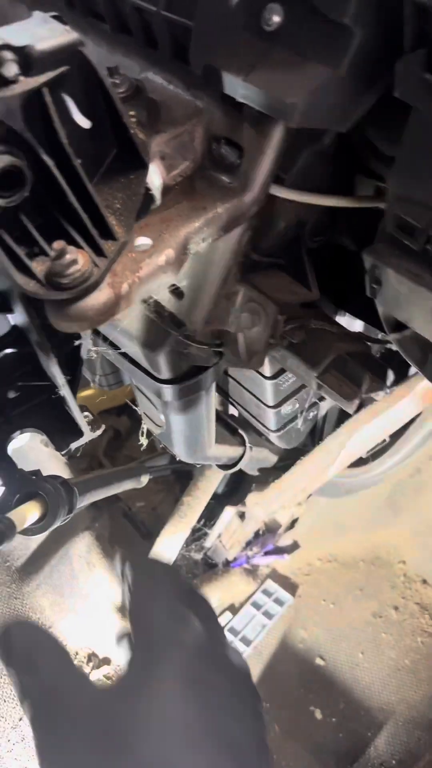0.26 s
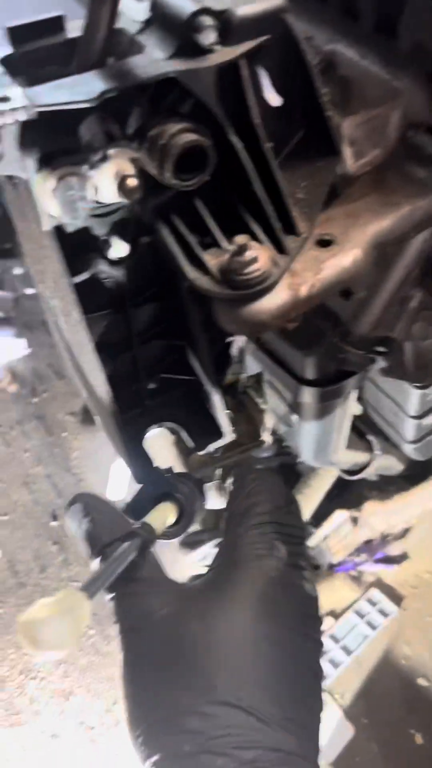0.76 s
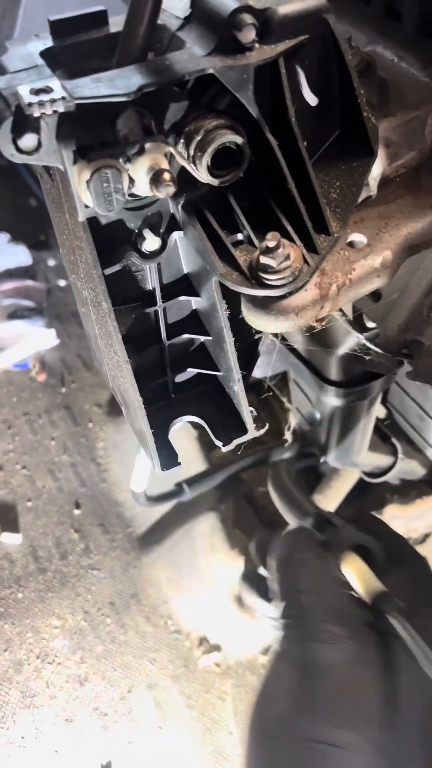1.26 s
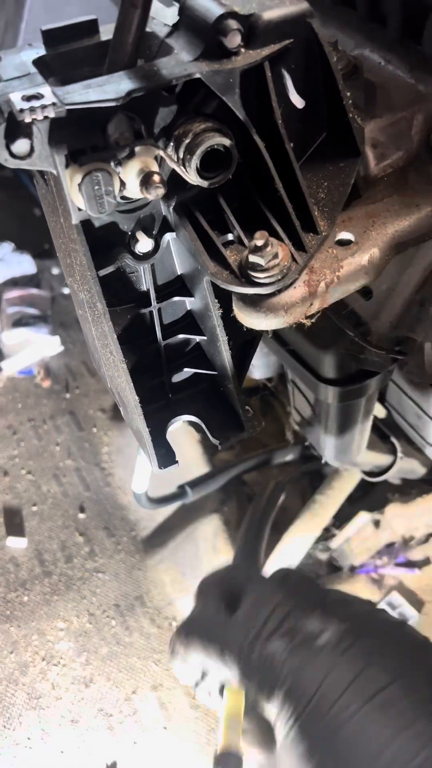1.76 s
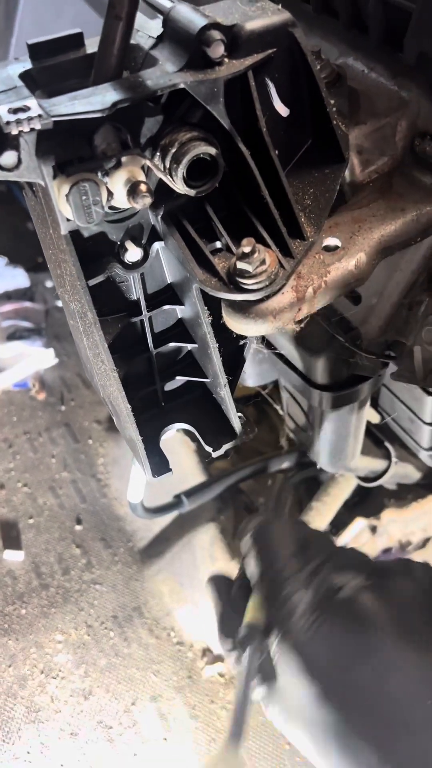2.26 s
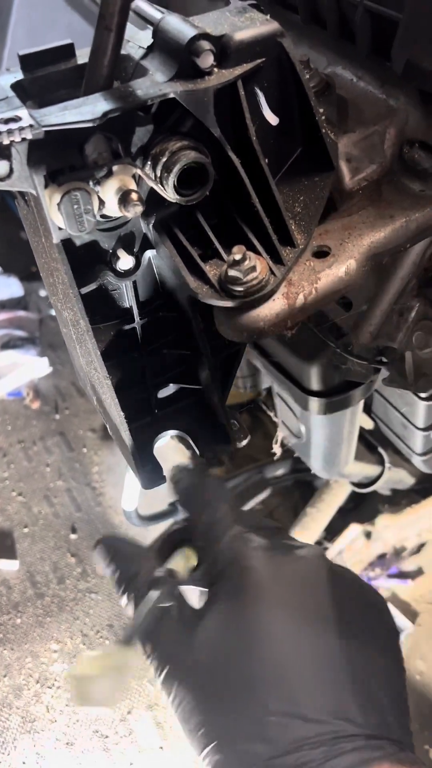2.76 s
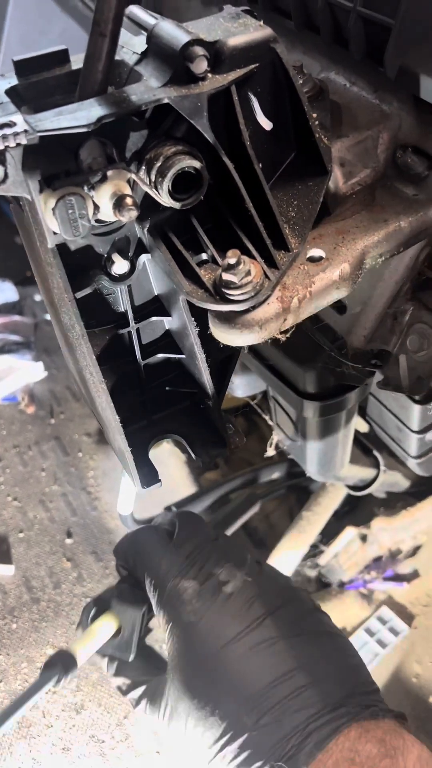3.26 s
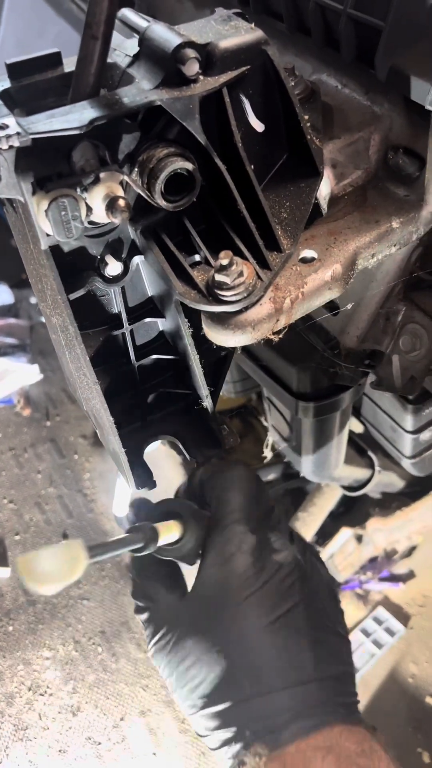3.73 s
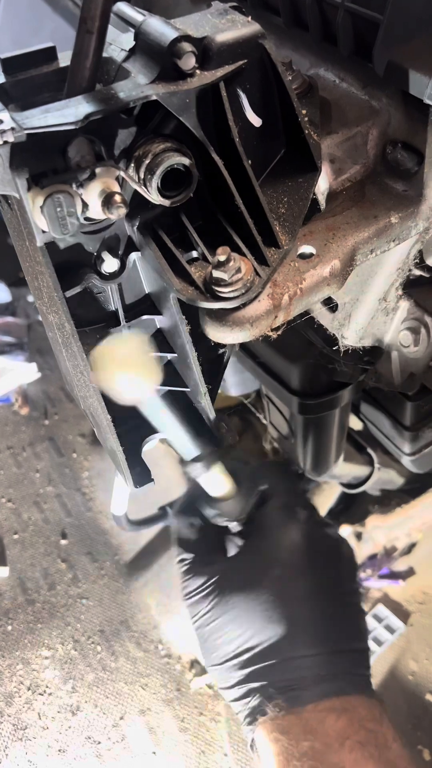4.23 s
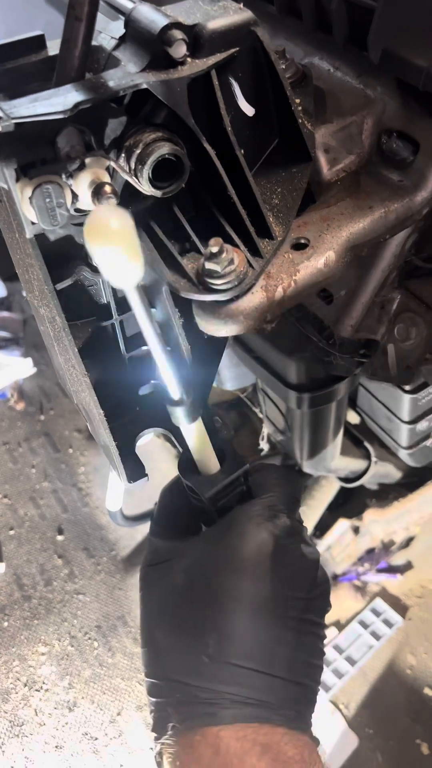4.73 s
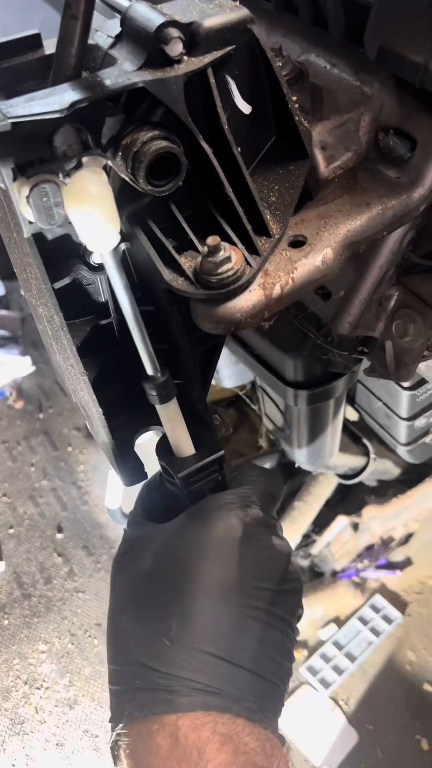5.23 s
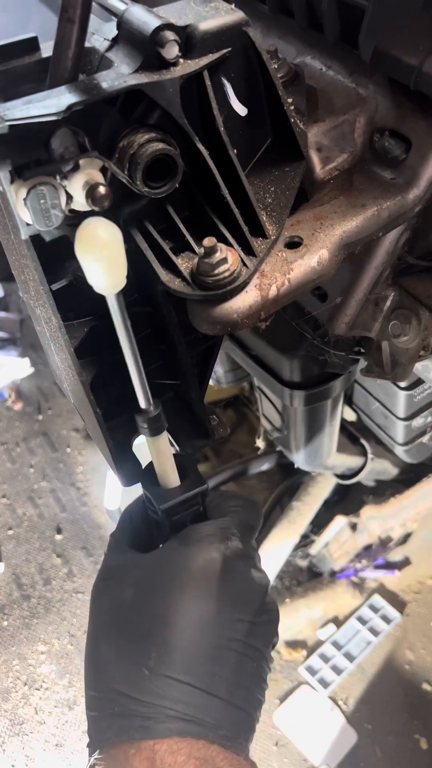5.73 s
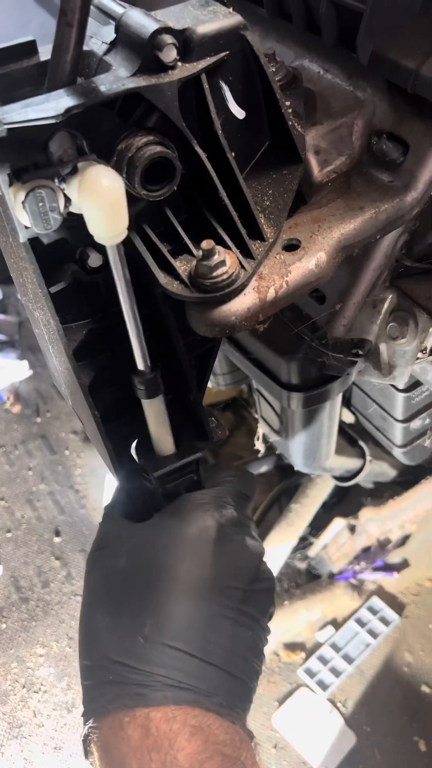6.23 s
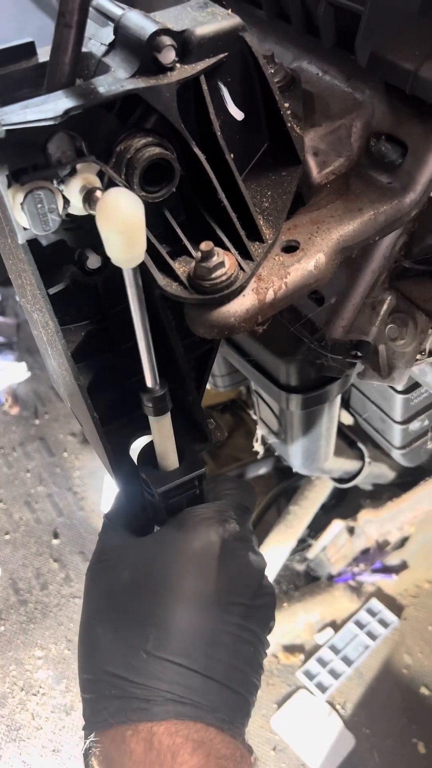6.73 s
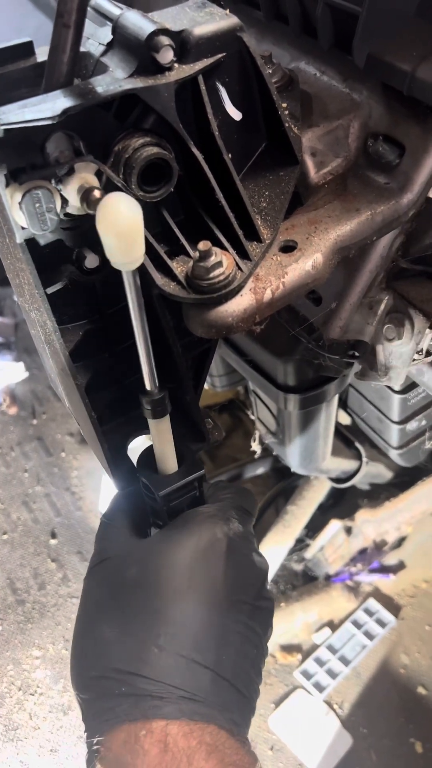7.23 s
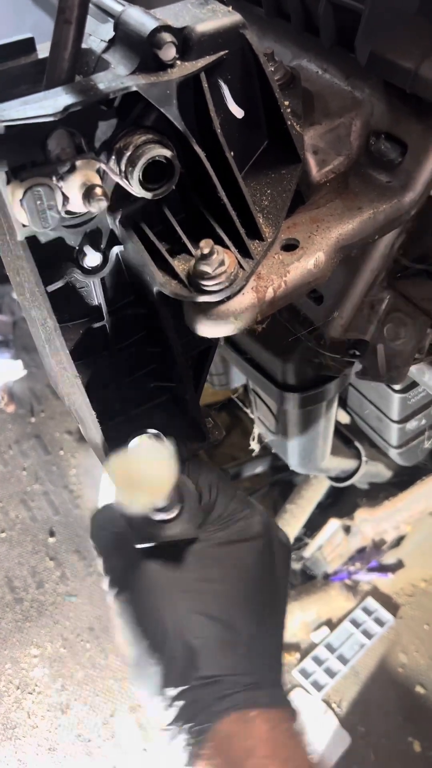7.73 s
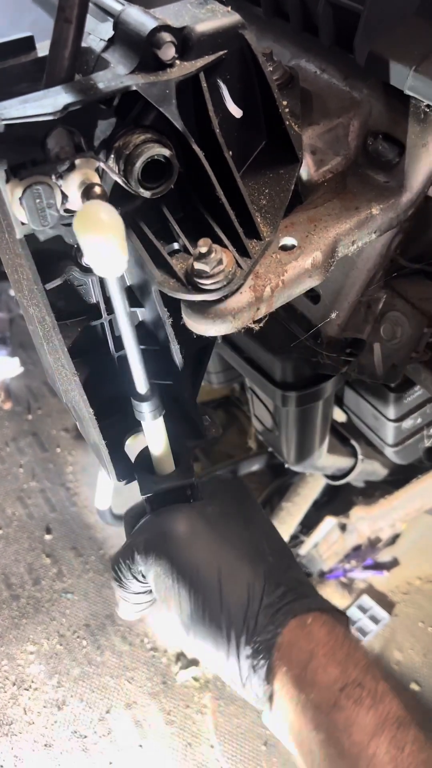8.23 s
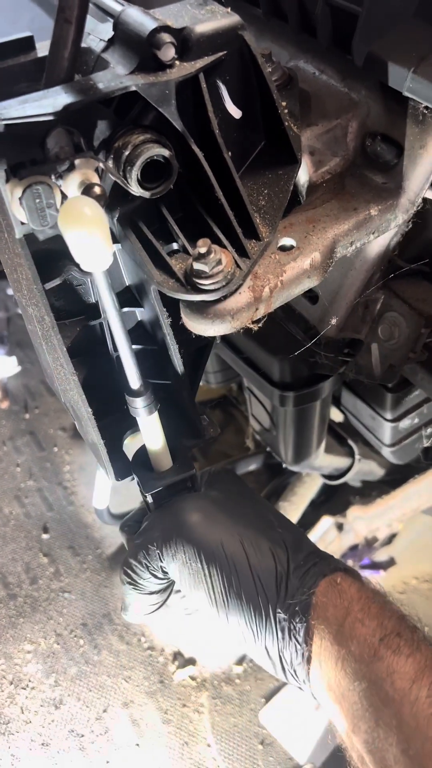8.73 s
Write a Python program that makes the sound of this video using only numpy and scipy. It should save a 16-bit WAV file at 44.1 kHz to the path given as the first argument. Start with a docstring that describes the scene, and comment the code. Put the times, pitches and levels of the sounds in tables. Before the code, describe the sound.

Close up in a van footwell, a gloved hand feeds a gear cable into a plastic housing: short soft hisses, rustles, faint ticks and light knocks. Just before five seconds a loud clunk begins a run of irregular hard shoves, with low booming thuds, plastic clicks, a brief damped metal ring and gritty scrapes. A close phone microphone adds faint steady hiss, slightly stronger on the left.

```python
"""A gloved hand feeds a gear cable into the plastic housing of a van's gear lever, then works it into its seat.
At first the cable hisses through the glove, with rustles, light ticks and soft knocks.
From about 4.9 s come hard shoves: each sends a bending wave through the housing, a thud that falls in pitch,
and the cabin booms after it. Plastic clicks ring the metal cable end, and gritty scrapes run between them.
The mount rumbles with the hand's effort, and a phone close by adds its own faint hiss throughout."""
import sys
import numpy as np
from scipy import signal
from scipy.fft import rfft, irfft
from scipy.io import wavfile

SR = 44100
rng = np.random.default_rng(int(sys.argv[2]) if len(sys.argv) > 2 else 0)


def generate_wav(sig):
    """Save sig (samples, or channels by samples) to the path in sys.argv[1] as 16-bit PCM at SR."""
    pcm = np.round(np.clip(np.atleast_2d(sig).T, -1, 1) * 32767).astype(np.int16)
    wavfile.write(sys.argv[1], SR, pcm)


N = 396459  # length in samples, about 9 s

# Shoves on the housing. Each row: start in seconds, then relative levels in dB of
# the boom near 60 Hz, the thud and the knock near 520 Hz.
SHOVES = [(0.159, -62, -43.5, -73.5), (0.198, -69, -56.5, -77.5), (0.493, -58, -45, -72.5),
          (1.138, -61, -63, -80), (1.52, -66, -55, -87), (1.99, -69, -76.5, -56),
          (2.579, -57.5, -63.5, -66.5), (2.783, -80, -61, -67.5), (3.781, -86, -62.5, -73),
          (3.915, -57.5, -54, -48), (4.299, -59, -54, -60.5), (4.502, -53, -56.5, -64.5),
          (4.655, -51.5, -70.5, -58.5), (4.926, -28, -34.5, -31.5), (4.96, -29, -41.5, -54.5),
          (5.086, -46, -53.5, -52), (5.391, -31.5, -41, -37.5), (5.678, -34, -49, -41),
          (5.815, -37, -33, -33), (5.875, -47, -51, -40), (5.924, -43, -43, -51),
          (6.236, -39.5, -44, -40.5), (6.269, -41.5, -47.5, -47.5), (6.495, -38.5, -56.5, -47),
          (6.535, -41.5, -46, -44.5), (6.634, -41.5, -48.5, -48.5), (6.89, -38, -47.5, -43.5),
          (7.318, -32.5, -39, -43.5), (7.385, -41.5, -48, -61), (7.54, -31.5, -55.5, -40.5),
          (7.569, -30, -45.5, -57.5), (7.674, -36.5, -56.5, -59), (8.068, -53.5, -51.5, -45),
          (8.11, -48, -56.5, -45), (8.15, -36.5, -49.5, -44), (8.3, -37, -47, -56.5)]
# Tone of a shove. Each row: frequency in Hz, level in dB.
SHOVE_COLOUR = [(22, -75.5), (32, -59.5), (42, -36), (70, -38.5), (130, -42), (240, -38), (360, -37),
                (500, -44.5), (750, -53), (1200, -66), (2500, -100)]
# Low resonances of cabin and mount. Each row: frequency in Hz, width in Hz, level in dB.
CABIN_RESONANCES = [(46.6, 5.4, 6), (62.6, 4.9, 10), (86.3, 9.1, 8), (110, 14, 6), (149, 11.8, -3),
                    (348.4, 19.4, -2.5), (585.4, 31, 1)]
BOOM_HZ, KNOCK_HZ = 60, 520
# A harder shove (more knock than thud) centres its thud higher, up to the panel's own limit.
THUD_HZ, THUD_TOP_HZ, HARDNESS_DB_PER_OCTAVE = 275.7, 310, 44
TRAVEL_S = .0102  # time a bending wave at 300 Hz takes to cross the housing


def knocks(power=.85, echo_lag_s=.03, echo_db=-8, ring_width_hz=22, ring_db=2,
           scatter_db=-9, scatter_t60_s=.22, level_db=-3):
    """Each shove arrives as a falling chirp, again by a longer path, rings the panel and scatters in the cabin."""
    out = np.zeros((2, N))
    t = np.arange(2 ** 14) / SR
    fade_out = np.cos(np.pi / 2 * t / t[-1]) ** 2
    direct = bending_wave(t, TRAVEL_S, power)
    for start, boom_db, thud_db, knock_db in SHOVES:
        hardness_octaves = (knock_db - thud_db) / HARDNESS_DB_PER_OCTAVE
        thud_hz = min(THUD_HZ * 2 ** hardness_octaves, THUD_TOP_HZ)
        longer_path_s = echo_lag_s * np.exp(.2 * rng.standard_normal())
        wave = direct + undb(echo_db) * bending_wave(t, longer_path_s, power)
        wave = colour(wave, *np.transpose(SHOVE_COLOUR))
        wave = colour(wave, [BOOM_HZ, thud_hz, KNOCK_HZ], [boom_db, thud_db, knock_db])
        wave = resonate(wave, [(thud_hz, ring_width_hz, ring_db)])
        add(out, start, cabin(wave * fade_out, scatter_db, scatter_t60_s))
    return undb(level_db) * resonate(out, CABIN_RESONANCES)


def bending_wave(t, lag_s, power):
    """A blow that has crossed a panel: highs come first, lows late; lag_s is the travel time at 300 Hz."""
    f = bins(t) / 300
    cycles = 300 * lag_s * f ** (1 - power) / (1 - power)
    return irfft(np.exp(-2j * np.pi * cycles), len(t)) * SR


# Hard contacts. Each row: start in seconds, then relative levels in dB of the clack near 1.4 kHz,
# the snap near 5 kHz, the edge near 13 kHz and the metal ring.
CONTACTS = [(0.711, -48, -57, -85, -64), (1.319, -70, -62, -60, -81), (1.993, -60, -77, -80, -88),
            (2.784, -52, -52, -53.5, -76), (3.837, -57, -50, -71, -76), (3.915, -50, -74, -80, -83),
            (4.494, -53.5, -74, -79, -81), (4.656, -56.5, -44, -55, -68), (4.926, -26, -39.5, -72, -51),
            (4.935, -35, -35, -56, -55), (4.964, -43.5, -37.5, -51, -66), (5.165, -58, -60, -100, -82),
            (5.394, -40, -39.5, -47, -46), (5.678, -52, -50, -86, -49), (5.812, -37, -62, -43, -54),
            (5.8185, -34.5, -34, -40.5, -69), (5.877, -35, -68, -72, -61), (5.922, -35.5, -62, -70, -59),
            (5.933, -37, -52.5, -56, -47), (6.191, -58, -60, -96, -73), (6.237, -54, -55.5, -93, -72),
            (6.498, -52, -57, -74, -65), (6.535, -52, -54, -83, -71), (6.636, -32.5, -50.5, -74, -66),
            (6.886, -44, -59, -70, -59), (6.897, -54, -47, -52, -60), (6.9045, -44, -68, -64, -70),
            (7.317, -48, -49, -65, -59.5), (7.388, -61, -58.5, -80, -70), (7.538, -44, -43, -56.5, -40.5),
            (7.5445, -42.5, -28, -30.5, -47), (7.548, -38, -37, -38.5, -67), (7.5785, -51, -39, -43, -61.5),
            (7.678, -48.5, -46.5, -72, -66.5), (8.112, -48, -71, -86, -72), (8.1495, -36, -49, -57.5, -49),
            (8.307, -63, -57, -67, -56)]
# The clack, snap and edge frequencies, in Hz.
CONTACT_BANDS_HZ = [1400, 5000, 13000]


def clicks(chatter_s=.007, chatter_db=-9, dull_db=-6, rub_s=.0045, rub_db=-18, level_db=11):
    """The parts rub for an instant, crack together, and chatter more dully until they sit still."""
    out = np.zeros((2, N))
    lead, crack_s = 512, .0012  # lead: samples of rubbing before the crack
    t = np.arange(-lead, 2 ** 12 - lead) / SR
    crack = (t >= 0) * np.exp(-abs(t) / crack_s)
    rub = undb(rub_db) * np.exp(-abs(t) / rub_s)
    after = undb(chatter_db) * np.exp(-abs(t) / chatter_s)
    loose = np.where(t < 0, rub, after)
    for start, clack_db, snap_db, edge_db, _ in CONTACTS:
        chatter = loose * grit(len(t), rate_hz=1200, spread_db=2.0)
        chatter = colour(chatter, CONTACT_BANDS_HZ, [0, 0, dull_db])
        burst = crack * rng.standard_normal((2, len(t))) + chatter
        add(out, start - lead / SR, colour(burst, CONTACT_BANDS_HZ, [clack_db, snap_db, edge_db]))
    return undb(level_db) * out


# Ring of the metal cable end. Each row: frequency in Hz, relative level in dB.
METAL_RING = [(2010, 1), (2160, -4), (2990, -7.5), (4550, -8.5), (4870, 1.5), (5040, -3), (6050, -10.5),
              (8190, -1), (8400, -11.5)]
METAL_T60_S = .085  # time to fade by 60 dB


def metal(level_db=0, spread_db=2.3):
    """The cable end rings a little differently at each contact; the hand damps it fast."""
    out = np.zeros((2, N))
    t = np.arange(2 ** 12) / SR
    hz, db = np.transpose(METAL_RING)[:, :, None]
    for start, *_, ring_db in CONTACTS:
        strength, detune, *phases = rng.standard_normal((4, len(hz), 1))
        pitch = hz * (1 + .009 * detune)
        decay = undb(db + spread_db * strength - 60 * t / METAL_T60_S)
        modes = decay * np.sin(2 * np.pi * (pitch * t + np.array(phases)))
        add(out, start, undb(ring_db + level_db) * modes.sum(axis=1))
    return out


# The fitting slips in its slot. Each row: start in seconds, end in seconds,
# relative level in dB near 1.4 kHz, relative level in dB near 5 kHz.
SLIPS = [(0.416, 0.541, -60.5, -70), (1.389, 1.415, -83, -63), (2.574, 2.646, -62, -80),
         (4.003, 4.104, -73, -64), (4.505, 4.533, -64, -68.5), (4.596, 4.637, -72, -73),
         (4.969, 5.034, -51.5, -57), (5.054, 5.091, -54.5, -57), (5.189, 5.256, -62, -69),
         (5.367, 5.404, -60, -60), (5.64, 5.683, -57.5, -55), (5.686, 5.734, -67, -52),
         (5.91, 5.935, -63.5, -55), (6.07, 6.099, -72, -64.5), (6.244, 6.289, -69, -64.5),
         (6.494, 6.562, -55.5, -59.5), (6.614, 6.678, -57, -57), (6.857, 6.915, -57.5, -59),
         (7.519, 7.553, -52.5, -46), (7.595, 7.673, -70.5, -65), (7.867, 8.094, -67, -73.5),
         (8.075, 8.127, -54.5, -58.5), (8.174, 8.265, -67.5, -63.5), (8.283, 8.321, -62, -65)]
SCRAPE_EDGE_DB = -25  # near 13 kHz, relative to 5 kHz, before the shared contact colour


def scrapes(slip_hz=900, spread_db=4, level_db=4):
    """Short gritty runs of stick and slip."""
    out = np.zeros((2, N))
    fade_s = .012
    for start, end, low_db, high_db in SLIPS:
        size = max(int((end - start + 2 * fade_s) * SR), 64)
        levels_db = [low_db, high_db, high_db + SCRAPE_EDGE_DB]
        rub = colour(grit(size, slip_hz, spread_db), CONTACT_BANDS_HZ, levels_db)
        add(out, start - fade_s, rub * signal.windows.tukey(size, .8))
    return undb(level_db) * out


# Pulls of the cable through the glove. Each row: second of greatest speed, length in seconds,
# relative level in dB.
CABLE_PULLS = [(0.44, 0.2, -67), (0.78, 0.51, -70), (1.4, 0.056, -60), (1.58, 0.21, -63),
               (1.735, 0.13, -58.5), (1.87, 0.042, -64), (1.94, 0.045, -65), (2.08, 0.24, -69.5),
               (2.565, 0.091, -61.5), (2.735, 0.051, -56), (2.865, 0.097, -58.5), (2.975, 0.035, -59),
               (3.04, 0.13, -60.5), (3.22, 0.035, -62), (3.36, 0.39, -79), (3.53, 0.094, -71.5),
               (3.79, 0.056, -57.5), (3.94, 0.063, -63), (4.05, 0.21, -69.5), (4.89, 0.034, -58),
               (7.535, 0.045, -53.5)]
PULL_RISE_SHARE, PULL_SHAPE = .56, 1.2  # weight of the speeding-up side; 1 = pointed, 2 = rounded
# Tone of the sliding sheath. Each row: frequency in Hz, level in dB.
SHEATH_COLOUR = [(300, -19), (800, -5.5), (1600, 2.5), (2600, -2.5), (5000, 0.5), (6500, -4), (8500, -6.5),
                 (10500, -28.5), (15500, -15)]
# Treble of the sheath under a hard pull. Each row: frequency in Hz, level in dB.
HARD_PULL_COLOUR = [(3000, -26), (6000, -9.5), (9000, 7.5), (10800, -9), (12500, 0.5), (15500, -8.5)]
# Resonances of the plastic housing. Each row: frequency in Hz, width in Hz, level in dB.
HOUSING_RESONANCES = [(957, 70, -5.5), (1140, 100, -2), (1330, 180, -10.5), (1480, 100, 1), (1950, 71, -5),
                      (3540, 270, -6), (4650, 210, -11), (5270, 270, -9), (6000, 440, -3), (7050, 250, -5)]


def slide(slip_hz=450, spread_db=2.0, level_db=-1, bright_db=3, brightening=.55, crackle_db=-7):
    """The cable sheath hisses through the glove; a hard pull adds treble, and the glove's creases crackle."""
    speed = strokes(CABLE_PULLS, PULL_RISE_SHARE, PULL_SHAPE)
    rub = unit(colour(grit(N, slip_hz, spread_db), *np.transpose(SHEATH_COLOUR)))
    squeeze = unit(colour(grit(N, slip_hz, spread_db), *np.transpose(HARD_PULL_COLOUR)))
    squeeze *= undb(bright_db) * (speed / speed.max()) ** brightening
    creases = grit(N, rate_hz=400, spread_db=6.5)
    creases = colour(creases, [1000, 3000, 6000, 10000], [-20, 0, 0, -20])
    creases = unit(cabin(resonate(creases, HOUSING_RESONANCES), wet_db=-2.5, t60_s=.08))
    return speed * undb(level_db) * (rub + squeeze + undb(crackle_db) * creases)


# How hard the hand bears on the mount, light while feeding and heavy while seating.
# Each row: time in seconds, effort in dB.
HAND_EFFORT = [(0.0, -58.5), (0.58, -54.5), (1.1, -63.5), (2.45, -67), (2.7, -58.5), (3.7, -64.5),
               (4.0, -57.5), (4.3, -73.5), (4.56, -51), (4.88, -67), (5.08, -40), (6.55, -46.5),
               (7.25, -51), (7.62, -44), (7.92, -50.5), (8.42, -42.5), (8.58, -62.5), (8.99, -55.5)]
# The glove brushes over the trim. Each row: second of greatest speed, length in seconds, level in dB.
GLOVE_BRUSHES = [(0.56, 0.31, -62), (1.58, 0.31, -69.5), (2.8, 0.42, -62.5), (3.28, 0.56, -62.5),
                 (5.7, 0.089, -47), (6.14, 0.26, -62), (8.0, 0.4, -59.5)]
BRUSH_RISE_SHARE, BRUSH_SHAPE = .37, 2.9
# Tone of the rumbling mount. Each row: frequency in Hz, level in dB.
MOUNT_COLOUR = [(20, -33.5), (31, -21), (43, 2.5), (62, 2), (85, -11), (130, -10.5), (200, -30),
                (500, -82.5)]
# Tone of the rustling glove. Each row: frequency in Hz, level in dB.
GLOVE_COLOUR = [(80, -8.5), (160, -2), (300, 1.5), (420, -7), (600, -12), (1000, -14), (2000, -18),
                (4000, -24), (8000, -44)]


def strain(rumble_db=0, grip_db=-15, brush_db=0):
    """The mount rumbles with the hand's effort; the glove rustles as it grips and as it brushes the trim."""
    effort = undb(np.interp(np.arange(N) / SR, *np.transpose(HAND_EFFORT)))
    gripping = undb(grip_db) * effort
    brushing = undb(brush_db) * strokes(GLOVE_BRUSHES, BRUSH_RISE_SHARE, BRUSH_SHAPE)
    rumble = unit(colour(rng.standard_normal((2, N)), *np.transpose(MOUNT_COLOUR)))
    rustle = unit(colour(grit(N, rate_hz=170, spread_db=2.46), *np.transpose(GLOVE_COLOUR)))
    return undb(rumble_db) * effort * rumble + np.hypot(gripping, brushing) * rustle


# Microphone hiss. Each row: frequency in Hz, left level in dB per Hz, right level in dB per Hz.
MICROPHONE_HISS = [(100, -102, -102), (348, -104, -104), (720, -111, -112), (1040, -99, -106),
                   (1325, -99, -104), (1570, -88, -103), (1774, -90.5, -102), (2196, -102, -112),
                   (3016, -110, -116), (4700, -107, -123), (5490, -114, -120), (7220, -105, -122),
                   (8000, -128, -129), (14900, -138, -138)]


def hiss():
    """Steady microphone noise, stronger on the left."""
    hz, *sides = np.transpose(MICROPHONE_HISS)
    noises = [colour(rng.standard_normal(N), hz, db) for db in sides]
    return np.array(noises) * np.sqrt(SR / 2)  # turns level per Hz into noise amplitude


def cabin(x, wet_db, t60_s, build_s=.0052):
    """The direct sound and two unrelated washes of close reflections."""
    t = np.arange(2 ** 13) / SR
    walls = rng.standard_normal((2, len(t))) * undb(-60 * t / t60_s) * (1 - np.exp(-t / build_s))
    walls *= undb(wet_db) / np.sqrt(np.sum(walls ** 2) / 2)
    walls[0, 0] = 1
    walls[1, int(.003 * SR)] = 1  # direct sound, 3 ms later in the second channel
    return signal.fftconvolve(np.atleast_2d(x), walls, axes=1)[:, :x.shape[-1]]


# The two microphone ports. Each row: frequency in Hz, left lead in radians,
# coherence (likeness) from 0 to 1, left minus right level in dB.
MICROPHONE_PORTS = [(60, 0, 0.98, 0.5), (300, 0.5, 0.99, 0), (463, 1.5, 0.96, -2.5), (650, 2.21, 1, 1.5),
                    (840, 1.5, 0.64, 0.5), (1585, 6, 0.03, -1), (3450, 2.5, 0.3, 1.5),
                    (5440, -1, 0.2, 11.5), (6740, 7, 0.3, 2), (8350, 4.5, 0.7, 1), (11000, 3, .95, 0.5),
                    (13800, 6, 0.61, -0.5)]


def ports(pair):
    """The right port hears the left one's sound shifted in phase, mixed with unrelated reflections."""
    hz, *columns = np.transpose(MICROPHONE_PORTS)
    lead, alike, pan_db = (along(bins(pair), hz, column) for column in columns)
    direct, diffuse = rfft(pair)
    right = alike * np.exp(-1j * lead) * direct + np.sqrt(1 - alike ** 2) * diffuse
    balance = undb(pan_db)
    return irfft(np.array([direct * balance, right]) * np.sqrt(2 / (1 + balance ** 2)), N)


def strokes(rows, rise_share, shape):
    """Gain of a series of hand movements: each speeds up to its peak and slows down again."""
    power = np.zeros(N)
    for peak, length, db in rows:
        t = np.arange(-min(2 * length, peak), 2 * length, 1 / SR)
        away = np.maximum(-t / rise_share, t / (1 - rise_share)) / length
        add(power, peak + t[0], (undb(db) * np.exp(-away ** shape)) ** 2)
    return np.sqrt(power)


def grit(size, rate_hz, spread_db):
    """Two noises, roughened together by tiny slips of uneven strength."""
    hold = max(int(SR / rate_hz), 2)
    strengths = undb(spread_db * rng.standard_normal(size // hold + 1))
    slips = np.repeat(strengths, hold)[:size]
    return unit(rng.standard_normal((2, size)) * slips)


def resonate(x, modes):
    """The direct sound plus the ring of each resonance."""
    f = bins(x)
    response = 1
    for hz, width, db in modes:
        response = response + undb(db) / (1 + 1j * (f * f - hz * hz) / (f * width))
    return irfft(rfft(x) * response, x.shape[-1])


def colour(x, hz, db):
    """Filter by a smooth spectrum."""
    return irfft(rfft(x) * undb(along(bins(x), hz, db)), x.shape[-1])


def along(f, hz, values):
    """Join points by straight lines on a log-frequency axis."""
    return np.interp(np.log(f), np.log(hz), values)


def bins(x):
    """Frequencies in Hz of the spectrum of x, kept at 1 or above."""
    return np.maximum(np.fft.rfftfreq(x.shape[-1], 1 / SR), 1)


def undb(db):
    """Turn decibels into an amplitude factor."""
    return 10 ** (np.asarray(db) / 20)


def unit(x):
    """Scale to an rms of 1."""
    return x / np.sqrt(np.mean(x ** 2))


def add(track, start, sound):
    """Mix a sound into a track at a time in seconds."""
    i = max(int(start * SR), 0)
    track[..., i:i + sound.shape[-1]] += sound[..., :N - i]


# Tone shared by clicks and scrapes. Each row: frequency in Hz, level in dB.
CONTACT_COLOUR = [(150, -27.5), (500, 4), (900, 7), (1400, 2), (2600, 6.5), (5000, 4), (6800, -1),
                  (8500, 9), (10500, 0.5), (13000, 4), (16000, -10)]


def scene():
    """Clicks and scrapes sound through the housing and the footwell; all but the hiss meets at the two ports."""
    struck = colour(clicks() + scrapes(), *np.transpose(CONTACT_COLOUR))
    plastic = resonate(struck, HOUSING_RESONANCES)
    contacts = cabin(plastic + metal(), wet_db=-8.0, t60_s=.095)
    return ports(knocks() + contacts + slide() + strain()) + hiss()


NOTCH_HZ, NOTCH_WIDTH_HZ, NOTCH_DB = 10270, 720, -14  # the microphone ducts swallow this band
TOP_HZ = 16100  # nearly everything above is cut


def record(dry):
    """The phone's microphone ducts notch the treble, and it cuts the top."""
    notch = undb(NOTCH_DB * np.exp(-((bins(dry) - NOTCH_HZ) / NOTCH_WIDTH_HZ) ** 2))
    notched = irfft(rfft(dry) * notch, N)
    low_pass = signal.ellip(10, .2, 80, TOP_HZ, fs=SR, output="sos")
    return signal.sosfilt(low_pass, notched)


dry = scene()
out = record(dry)
generate_wav(out)
```